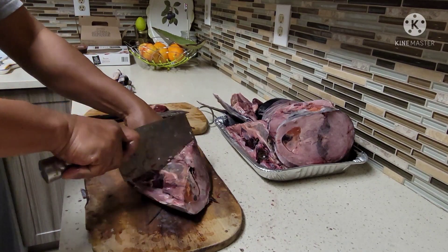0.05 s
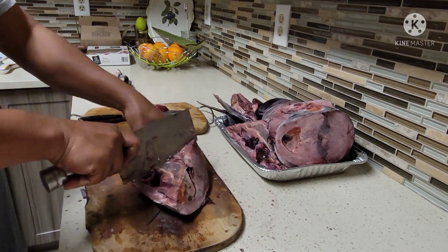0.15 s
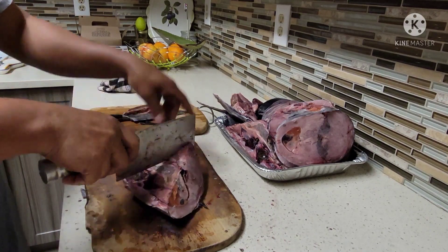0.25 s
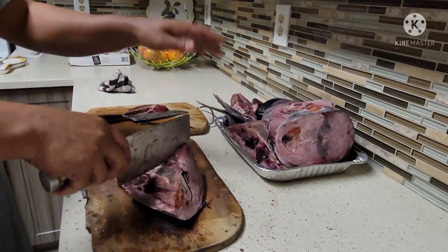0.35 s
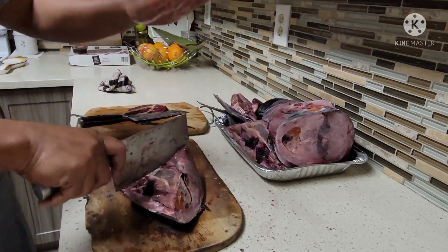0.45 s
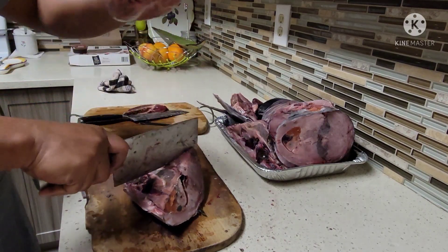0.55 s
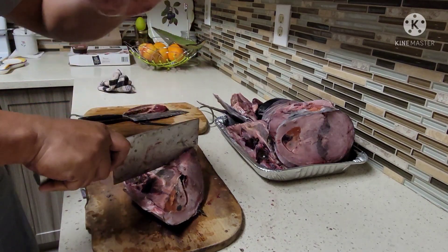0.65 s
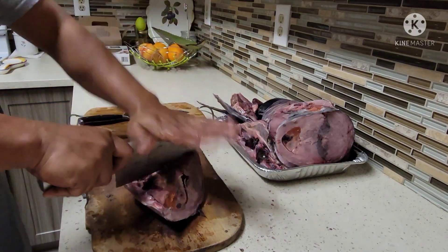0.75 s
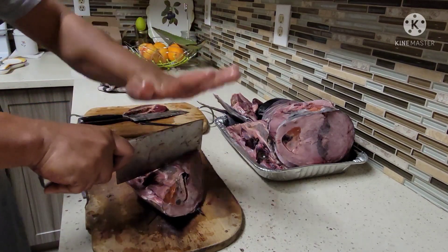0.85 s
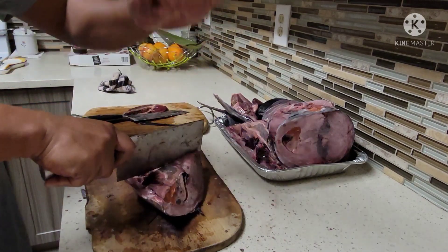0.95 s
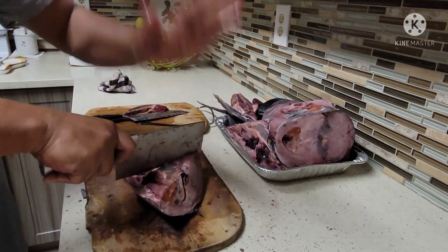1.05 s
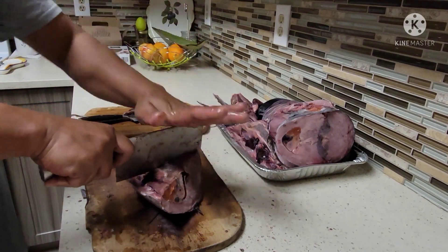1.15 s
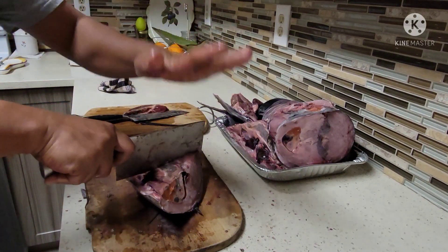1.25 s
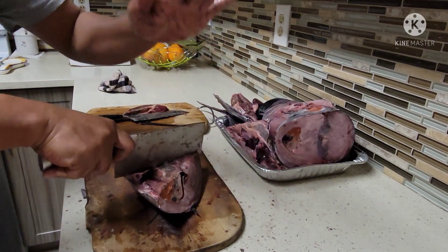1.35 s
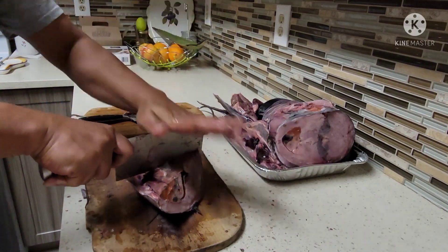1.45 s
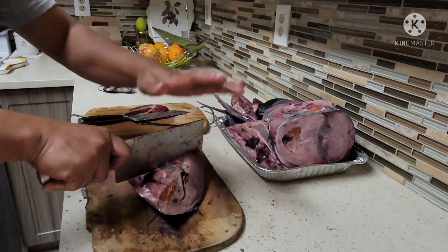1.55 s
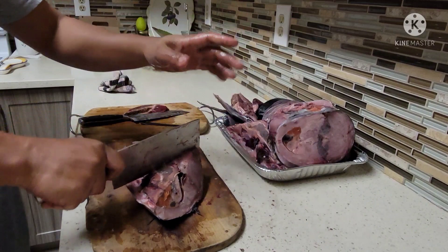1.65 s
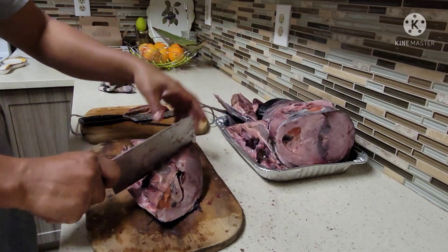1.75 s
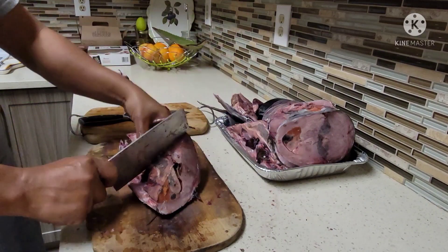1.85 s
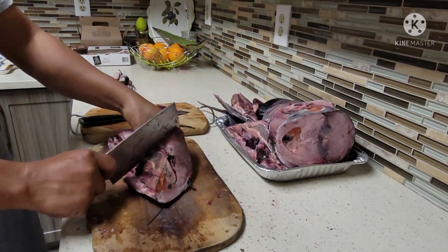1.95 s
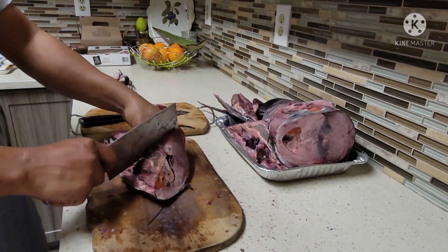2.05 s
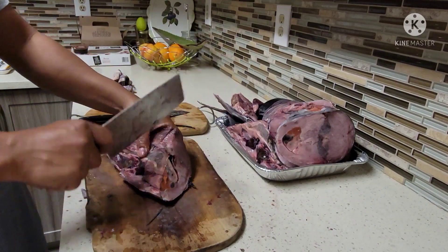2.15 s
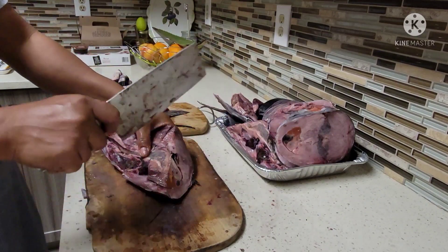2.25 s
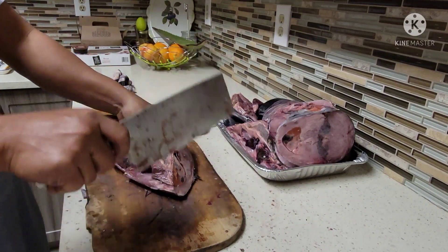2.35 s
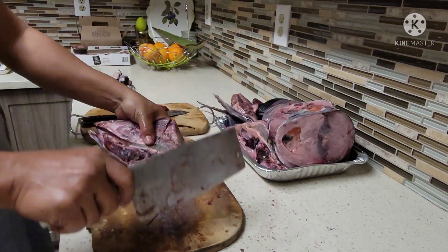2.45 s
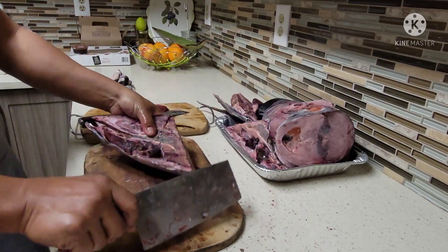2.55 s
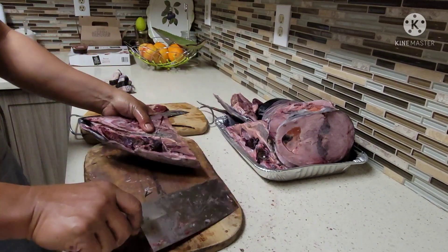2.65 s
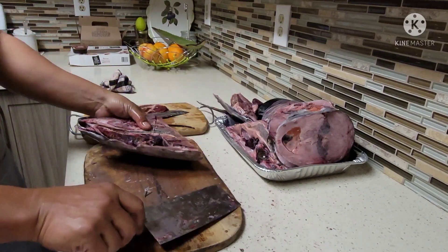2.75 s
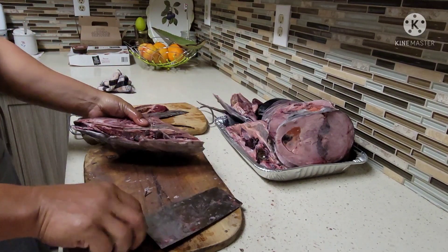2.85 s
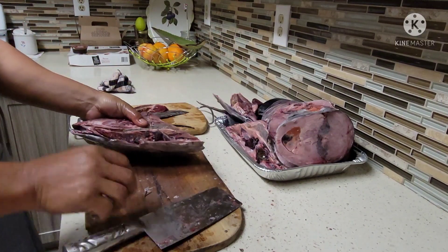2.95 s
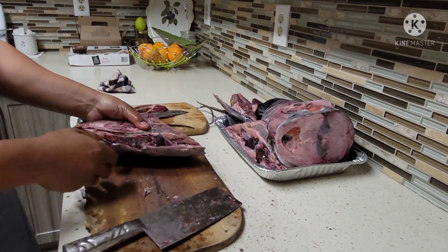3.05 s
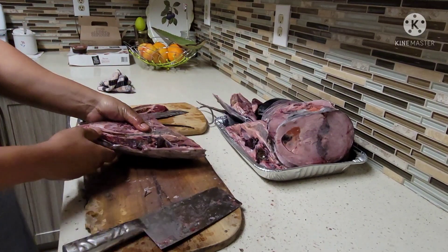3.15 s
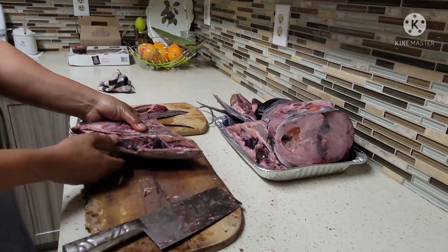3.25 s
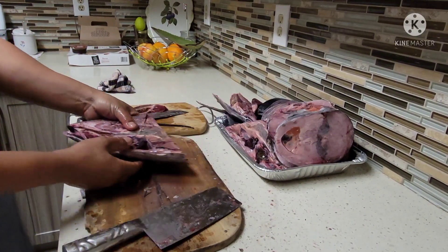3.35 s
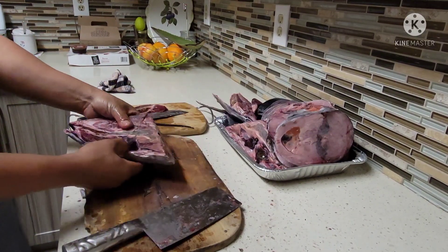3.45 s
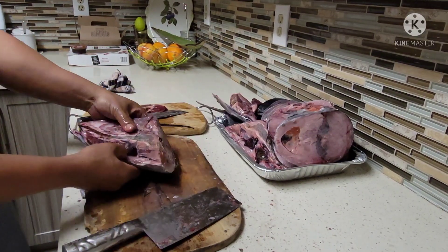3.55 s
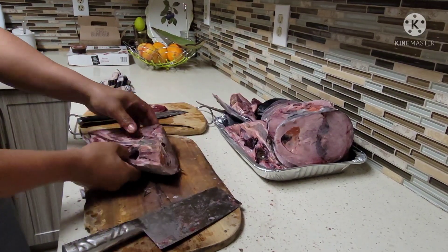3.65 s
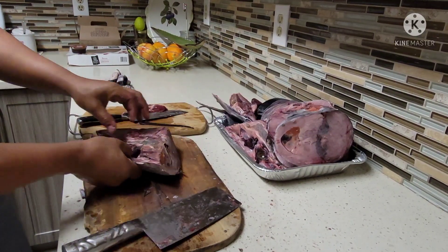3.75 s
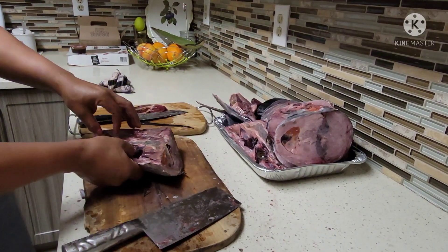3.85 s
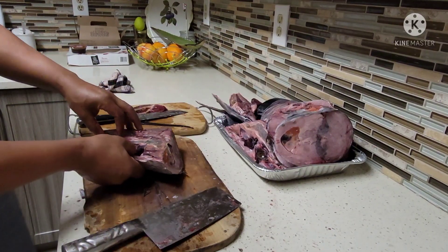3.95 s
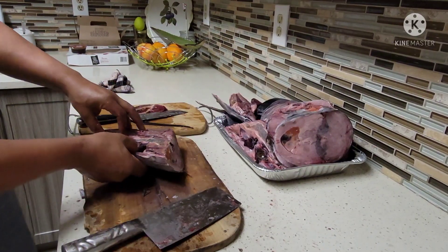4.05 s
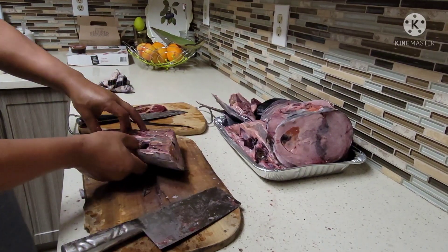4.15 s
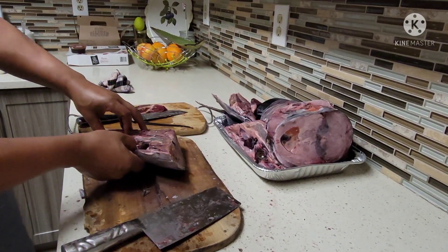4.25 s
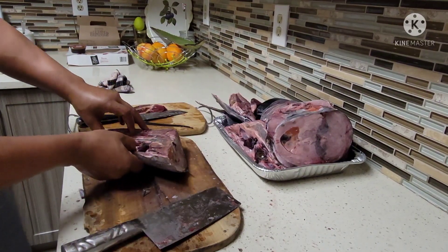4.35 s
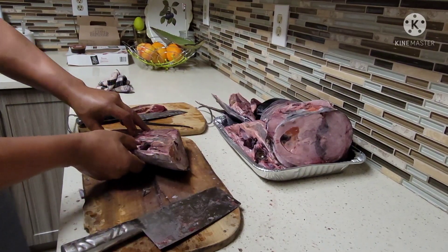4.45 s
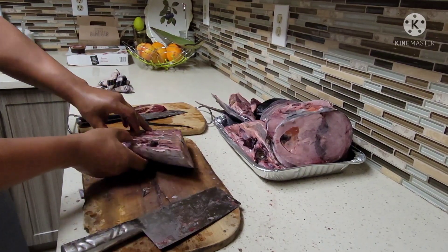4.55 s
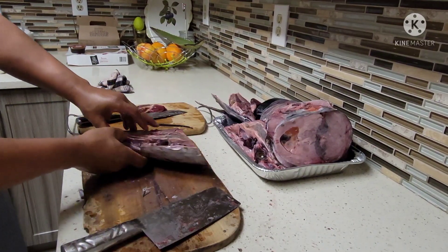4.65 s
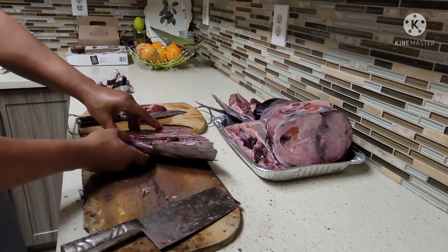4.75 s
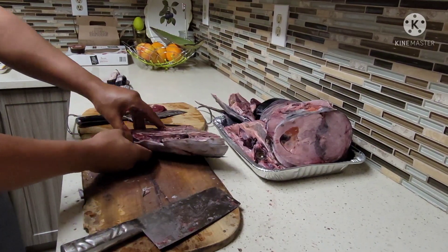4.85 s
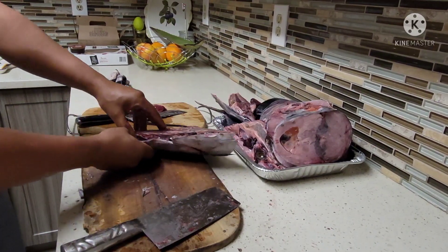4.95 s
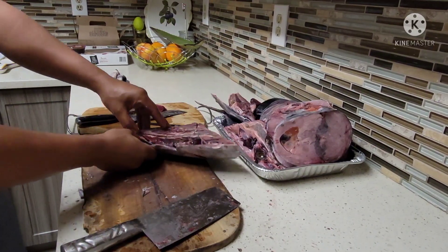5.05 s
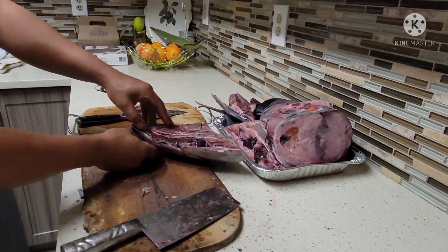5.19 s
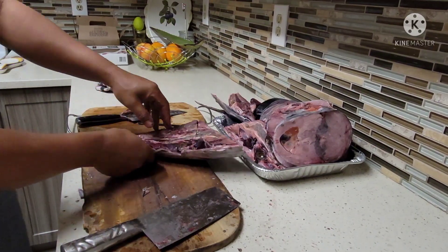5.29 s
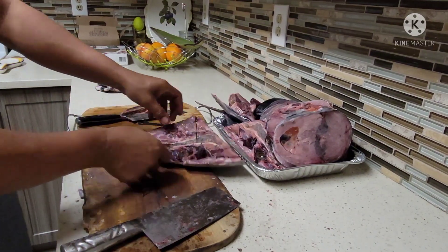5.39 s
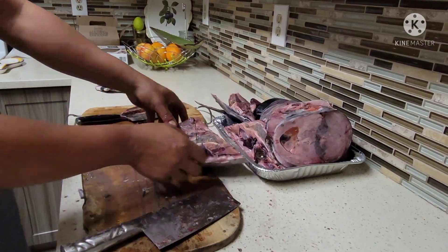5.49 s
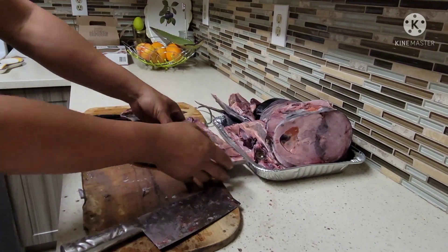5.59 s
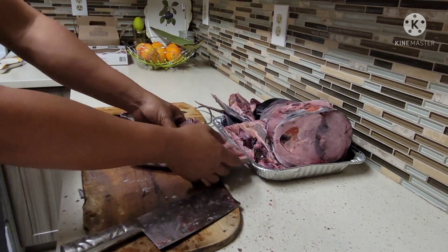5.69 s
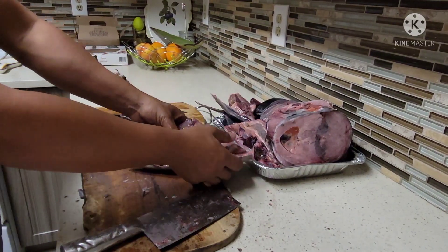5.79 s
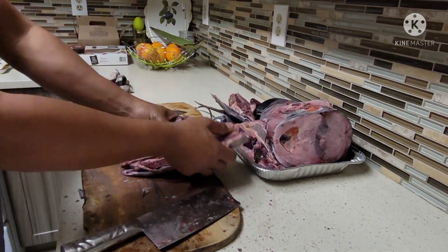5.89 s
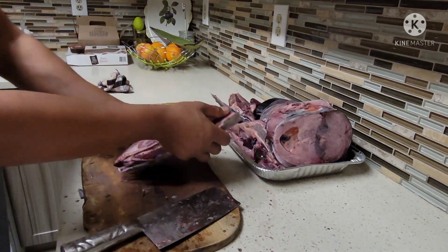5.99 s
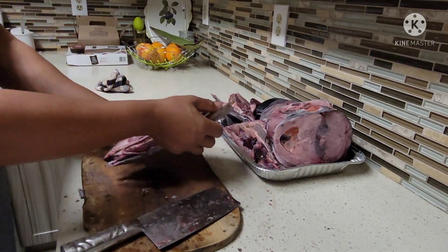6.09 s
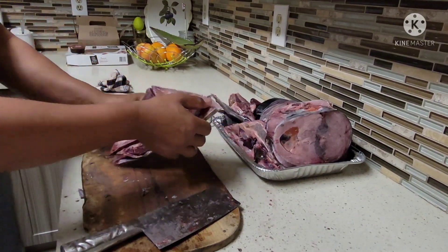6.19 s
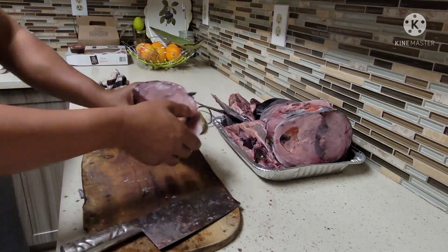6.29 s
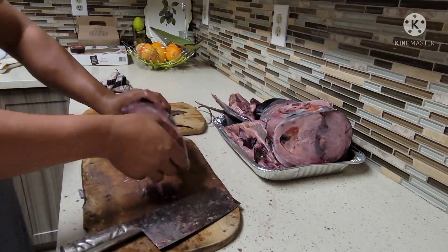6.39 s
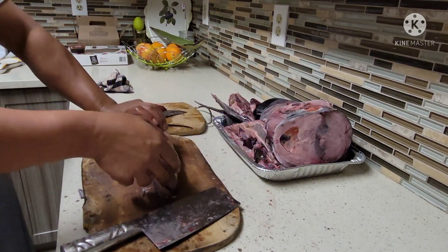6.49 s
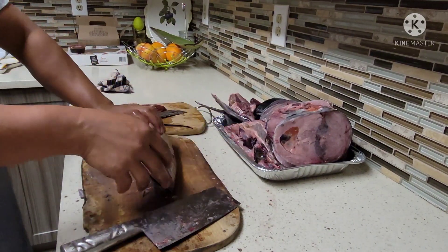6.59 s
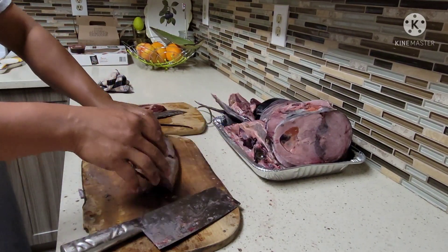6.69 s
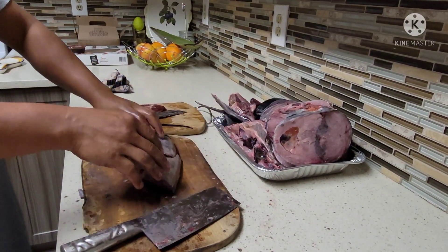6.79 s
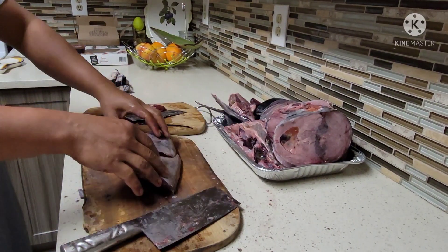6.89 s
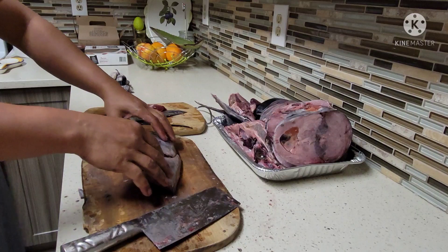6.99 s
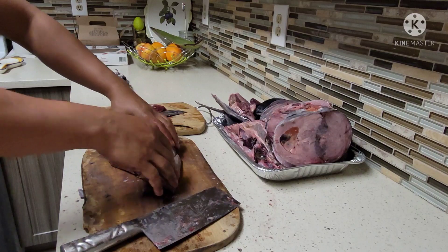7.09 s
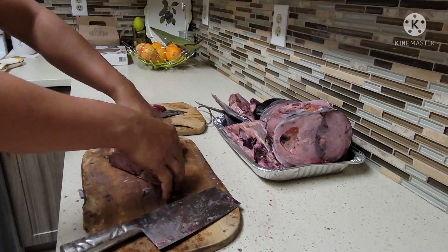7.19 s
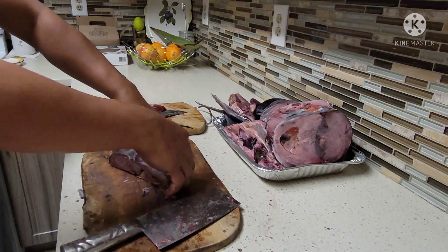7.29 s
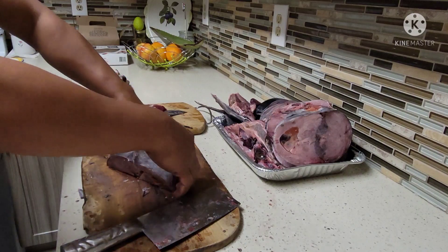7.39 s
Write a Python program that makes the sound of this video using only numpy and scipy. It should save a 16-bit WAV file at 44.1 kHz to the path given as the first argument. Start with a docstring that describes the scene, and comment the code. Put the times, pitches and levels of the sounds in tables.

```python
"""A small tiled kitchen, where a big fish is cut up on a wooden board. A palm drives a cleaver through it with
three blows; the fish is dragged aside, the cleaver is laid down (blade, then handle), a short ringing swish is
heard, and the wet slab is turned over and flopped back, bumping a foil tray. Board, steel and tray are sums of
damped modes; wet contacts are coloured noise bursts; rubbing and dragging are grainy friction noise. Short
hollow knocks and a faint airy tone are heard, fingers rub the crackling film, the room rumbles, and a faint low
hum swells and fades."""
import sys
import numpy as np
from scipy import signal
from scipy.fft import rfft, irfft, next_fast_len
from scipy.io import wavfile
from scipy.ndimage import uniform_filter1d, minimum_filter1d, map_coordinates

SR = 44100
rng = np.random.default_rng(int(sys.argv[2]) if len(sys.argv) > 2 else 0)


def dump(signal):
    """Clip the signal to [-1, 1] and save it as 16-bit WAV at the path in sys.argv[1]."""
    limited = np.clip(np.atleast_2d(signal).T, -1, 1)
    pcm = np.round(limited * 32767).astype(np.int16)
    wavfile.write(sys.argv[1], SR, pcm)


N = 327663  # samples in the scene
T = np.arange(SR * 6 // 10) / SR  # the time axis of one short event, in seconds

# Spectrum of sharp, bright clicks. Each row: frequency in Hz, level in dB.
SNAP_COLOUR = [(600, -15.5), (5500, 1), (15000, -5)]
# Spectrum of the crackling sticky film. Each row: frequency in Hz, level in dB.
CRACKLE = [(800, -23.5), (2500, -0.5), (5000, 0), (8000, -2), (11000, -8), (14500, -5.5)]


def amp(db):
    """Decibels are logarithmic: 20 dB is a factor of ten in amplitude."""
    return 10 ** (np.asarray(db) / 20)


def unit(x):
    """Normalisation of the mean power: the result has rms 1."""
    return x / np.sqrt(np.mean(x ** 2) + 1e-20)


def fade(t60):
    """Exponential damping: the amplitude falls by 60 dB in t60 seconds."""
    return 1000. ** (-T / max(t60, 1e-4))


def along(points, hz):
    """Logarithmic frequency scale: (Hz, value) points are joined by straight lines on it."""
    f, v = np.transpose(points)
    return np.interp(np.log(hz + 1), np.log(f + 1), v)


def add(out, s, sound):
    """Superposition: a sound is mixed in from time s, in seconds."""
    part = out[:, round(s * SR):][:, :sound.shape[-1]]
    part += sound[..., :part.shape[1]]


def filtered(x, response):
    """Linear filtering: the spectrum is multiplied by a response of frequency."""
    size = next_fast_len(x.shape[-1] + 8192)
    spectrum = rfft(x, size) * response(np.fft.rfftfreq(size, 1 / SR))
    return irfft(spectrum, size)[..., :x.shape[-1]]


def causal(x, db_of, size=4096):
    """Minimum phase: a folded cepstrum colours a hit without ringing ahead of it."""
    cepstrum = irfft(np.log(amp(db_of(np.fft.rfftfreq(size, 1 / SR)))))
    cepstrum[1:size // 2] *= 2
    cepstrum[size // 2 + 1:] = 0
    impulse_response = irfft(np.exp(rfft(cepstrum)))
    return signal.fftconvolve(x, impulse_response)[:len(x)]


def ring(modes, scatter_db):
    """Modal superposition: damped sines of alternating sign, each struck a little differently."""
    total = 0
    for k, (hz, db, t60) in enumerate(modes):
        strength = (-1) ** (k + 1) * amp(db + scatter_db * rng.normal())
        total = total + strength * np.sin(2 * np.pi * hz * T) * fade(t60)
    return total


def burst(length, rise):
    """Broadband impact noise: a dying spray, whitened to an even colour and scaled to energy 1."""
    x = rng.standard_normal(len(T)) * fade(length) * (1 - np.exp(-T / rise))
    power = np.abs(uniform_filter1d(np.abs(rfft(x, 4096)) ** 2, size=15))
    x = causal(x, lambda hz: -10 * np.log10(power / power.mean() + 1e-3))
    return x / np.linalg.norm(x)


def grains(colour, spiky):
    """Granular noise of rms 1: stereo noise whose strength varies unevenly over milliseconds."""
    knots = rng.standard_normal(N // 64 + 4)
    size = np.exp(spiky * map_coordinates(knots, [np.arange(N) / 64], order=1))
    noise = size * rng.standard_normal((2, N))
    return unit(filtered(noise, lambda hz: amp(along(colour, hz))))


def kitchen(x, wet_db):
    """Reverberation: direct sound, left ear first, plus a dense decaying tail from tiles and counter."""
    # Decay time of the room. Each row: frequency in Hz, t60 in seconds.
    room_decay = [(100, 0.57), (400, 0.23), (1500, 0.3), (5000, 0.24), (14000, 0.2)]
    hz, t, z = signal.stft(rng.standard_normal((2, len(T))), SR, nperseg=256)
    decaying = z * 1000. ** (-t / along(room_decay, hz)[:, None])
    tail = signal.istft(decaying, SR, nperseg=256)[1][:, :len(T)]
    tail *= 1 - np.exp(-T / 0.0005)
    tail /= np.linalg.norm(tail, axis=1, keepdims=True)
    direct = np.array([x, np.pad(x, (3, 0))[:len(x)]])  # right ear 3 samples late
    return direct + amp(wet_db) * signal.fftconvolve(x[None], tail, axes=1)[:, :len(x)]


def swell(s, attack, hold, release):
    """Envelope of one stroke: exponential growth to 1 at time s, a hold, then exponential decay."""
    t = np.arange(N) / SR - s
    growth = np.minimum(t, 0) / max(attack, 1e-3)  # attack and release are time constants in seconds
    decay = np.maximum(t - hold, 0) / max(release, 1e-3)
    return np.exp(growth - decay)


def bell(s, width):
    """Gaussian envelope: a gain that rises to 1 at time s and falls again."""
    return np.exp(-((np.arange(N) / SR - s) / max(width, 1e-3)) ** 2)


def wobble(rate):
    """Random modulation: a smooth curve through rate random knots a second."""
    return map_coordinates(rng.standard_normal(size=256), [np.arange(N) * rate / SR], mode="wrap")


def ambience():
    """Diffuse field: a rumble nearly alike at both ears in the bass, and a faint hum that swells twice."""
    # Spectrum of the room's rumble. Each row: frequency in Hz, level in dB.
    air_colour = [(13, -32.5), (22, -8.5), (44, -6), (59, -14.5), (92, -6.5), (198, -41), (371, -34),
                  (608, -38.5), (1630, -37), (1770, -35.5), (2270, -37.5), (15500, -48)]
    # Spectrum of the fuzzy low hum. Each row: frequency in Hz, level in dB.
    hum_colour = [(230, -42.5), (300, -5), (330, 1), (400, -5), (520, -17.5), (800, -9), (1200, -41)]
    # Swells of the hum. Each row: time of the peak in seconds, half width in seconds, level in dB.
    hum_swells = [(1.9, 0.19, -66), (3.85, 0.26, -67)]
    mid, side = rng.standard_normal((2, N))
    side = filtered(side, lambda hz: amp(along([(100, -12), (600, 3.0)], hz)))
    ears = np.array([mid + side, mid - side])
    air = unit(filtered(ears, lambda hz: amp(along(air_colour, hz))))
    hum_gain = amp(-79.5) + sum(amp(db) * bell(s, width) for s, width, db in hum_swells)
    return amp(-63.0) * air + hum_gain * grains(hum_colour, spiky=.1)


def handling():
    """Pressure-dependent friction: fingers rub the flesh and its sticky film crackles with each grip."""
    # A hand grips or shifts the wet fish. Each row: time of firmest pressure in seconds,
    # half width in seconds, rub level in dB, crackle level in dB.
    grips = [(.108, 0.15, -62, -58.5), (.45, 0.12, -70.5, -63.5), (1.3, 0.75, -73.5, -68.5),
             (2.192, .05, -64.5, -64.5), (3.201, .08, -66.5, -66.5), (4.192, .045, -60.5, -72),
             (5.207, .019, -60, -55.5), (5.27, 0.1424, -65, -64.5), (5.42, .035, -67, -58.5),
             (6.783, .035, -52, -63.5), (5.781, .06, -56.5, -66.5), (6.19, 0.071, -65, -70.5),
             (7.211, .06, -64, -66)]
    # Spectrum of fingers rubbing flesh. Each row: frequency in Hz, level in dB.
    rub_colour = [(200, -10.5), (400, -4.5), (700, -0.5), (1250, 1.5), (2000, -8), (3000, -2.5),
                  (5000, -17.5), (12000, -35.5)]
    # light finger contact between the grips, with one moment of rest
    light_rub_db, light_crackle_db = -85, -83
    light_swing_db, light_moves_per_s = 4, 32
    still_s, still_width_s = 4.53, 0.22
    light = amp(light_swing_db * wobble(light_moves_per_s)) * (1 - bell(still_s, still_width_s))
    rub, crackle = amp(light_rub_db) * light, amp(light_crackle_db) * light
    for s, width, rub_db, crackle_db in grips:
        pressure = bell(s, width)
        rub = rub + amp(rub_db) * pressure
        crackle = crackle + amp(crackle_db) * pressure
    return rub * grains(rub_colour, spiky=0.4) + crackle * grains(CRACKLE, spiky=0.38)


def slaps():
    """Soft impact: wet skin sprays noise while the flesh squashes, with a hollow body and a fizz on top."""
    # Wet skin and flesh contacts. Each row: start in seconds, relative level in dB,
    # body tilt in dB, fizz tilt in dB, squash time in seconds.
    contacts = [(0.1121, -45, -21, 5, 0.0025), (0.824, -25, 4.5, -0.5, 0.005), (1.159, -22, 8, 1.5, .0042),
                (1.492, -28.5, 12, -6, 0.0042), (2.0127, -46.5, -11, -5, 0.0025),
                (5.7321, -42.5, -6, -9, 0.00117), (5.8234, -45, -4.5, -10.5, 0.00086),
                (5.852, -28, -26, -15, .0012), (5.9068, -31.5, -5, -5, 0.0018), (5.9201, -26, -7, -3, .002),
                (6.516, -38.5, -6, -3.5, 0.0029), (6.7987, -22, 6, -16, 0.0033)]
    # Spectrum of smacked flesh. Each row: frequency in Hz, level in dB.
    flesh = [(30, -43.5), (100, -11.5), (250, 8), (450, 6.5), (900, 4.5), (1500, 2.5), (3000, -2.5),
             (5000, 0.5), (7500, 1), (10500, -4.5), (15000, -5)]
    out = np.zeros((2, N))
    for s, db, body_db, fizz_db, squash in contacts:
        tilt = [(500, body_db), (1200, 0.0013), (3300, 0.0035), (7000, fizz_db)]
        spray = burst(length=6 * squash, rise=squash)
        smack = causal(spray, lambda hz: along(flesh, hz) + along(tilt, hz))
        add(out, s, amp(db + 20.5) * kitchen(smack, wet_db=6.0))
    return out


def snaps():
    """Sudden release: the last air squeezed from a wet contact gives a gritty, bright click, almost dry."""
    # Snaps of squeezed air. Each row: start in seconds, relative level in dB.
    releases = [(0.1128, -40.5), (0.8272, -19.5), (1.1638, -15.5), (1.497, -27.5), (5.909, -34.5),
                (5.92, -27), (6.8, -25.5)]
    length_s, rise_s = .02, .001
    out = np.zeros((2, N))
    for s, db in releases:
        steps = rng.standard_normal(len(T) // 24 + 1).repeat(24)[:len(T)]  # a new strength every 24 samples
        grit = burst(length_s, rise_s) * amp(4 * steps)
        snap = causal(grit / np.linalg.norm(grit), lambda hz: along(SNAP_COLOUR, hz))
        add(out, s, amp(db + 17.5) * kitchen(snap, wet_db=-5.5))
    return out


def ticks():
    """Adhesive release: the sticky film lets go of a finger with a tiny bright burst."""
    # Releases of the film. Each row: start in seconds, relative level in dB.
    film_releases = [(0.542, -61), (2.145, -63.5), (2.847, -55), (5.536, -59), (6.305, -66)]
    length_s, rise_s = 0.0068, .001
    out = np.zeros((2, N))
    for s, db in film_releases:
        tick = causal(burst(length_s, rise_s), lambda hz: along(CRACKLE, hz))
        add(out, s, amp(db + 31) * kitchen(tick, wet_db=6.5))
    return out


def thuds():
    """Impulse response: a soft push booms the board on its counter; it rocks back and lands twice, weaker."""
    # Weight landing on the board. Each row: start in seconds, relative level in dB, contact time in seconds.
    landings = [(0.826, -3, 0.0013), (1.163, 3.5, 0.0016), (1.497, -4.5, 0.00091), (2.172, -31, 0.0038),
                (2.695, -29.5, 0.00085), (2.915, -19, 0.0008), (3.701, -25, 0.0046), (3.749, -23, 0.003),
                (6.52, -17, 0.0037), (6.799, -14, 0.00075), (6.812, -45, 0.00031)]
    # Modes of the board on its counter. Each row: frequency in Hz, level in dB, t60 in seconds.
    board = [(65, -16, .22), (87.6, -2.5, .27), (139.7, -2, .1), (167.4, -5, .14), (118, -11, .24),
             (325, -19, .22), (345, -15, .2), (400, -9, .06)]
    out = np.zeros((2, N))
    for s, db, contact in landings:
        push = T / contact * np.exp(-T / contact)
        struck_board = ring(board, scatter_db=1.4)
        boom = amp(db + 4.5) * signal.fftconvolve(struck_board, push / push.sum())[:len(T)]
        add(out, s, kitchen(boom, wet_db=-20.0))
        for delay, rock_db in [(.107, -21.5), (.195, -35.5)]:
            add(out, s + delay, amp(rock_db) * kitchen(boom, wet_db=-14.5))
    return out * amp([[-1], [1]])  # 2 dB stronger on the right


def hollow_knocks():
    """Single-mode damping: short hollow knocks, each one damped tone, down 60 dB in 14 cycles."""
    # Hollow knocks. Each row: start in seconds, relative level in dB, frequency in Hz.
    damped_tones = [(1.196, -27.5, 1125), (3.762, -54, 870), (5.34, -43.5, 1220), (5.733, -43, 1103),
                    (5.852, -32, 1560), (6.809, -16, 344)]
    out = np.zeros((2, N))
    for s, db, hz in damped_tones:
        envelope = fade(14 / hz) * (1 - np.exp(-T * hz))
        knock = amp(db + 7.5) * np.sin(2 * np.pi * hz * T) * envelope
        add(out, s, kitchen(knock, wet_db=-5))
    return out


def drag():
    """Sliding friction: wet skin hisses over the board in one shove, up to speed, steady, then slowing."""
    # Spectrum of the sliding skin. Each row: frequency in Hz, level in dB.
    drag_colour = [(200, -21.5), (300, -8), (420, -2.5), (600, -6), (850, -10), (1200, -16.5), (1900, -15),
                   (2800, -5.5), (4300, -9), (5300, -5), (7000, -16), (9200, -10), (11000, -19),
                   (15000, -18.5)]
    shove = swell(s=2.485, attack=0.018, hold=.1, release=0.05)
    return amp(-37) * shove * grains(drag_colour, spiky=0.25)


def chime(modes):
    """Modal radiation: steel modes radiate in lobes, so each reaches the ears a quarter cycle apart."""
    ears = np.pi / 4 * np.array([[1], [-1]])
    tones = 0
    for k, (hz, db, t60) in enumerate(modes):
        phase = 2 * np.pi * (hz * T + rng.random()) + (-1) ** k * ears
        tones = tones + amp(db) * np.sin(phase) * fade(t60)
    return tones * (1 - np.exp(-T / .0007))


def steel(modes):
    """Reverberant blurring: ringing steel, with a room tail of its own for each ear."""
    tones = chime(modes)
    left = kitchen(tones[0], wet_db=-7.5)[0]
    right = kitchen(tones[1], wet_db=-7)[0]
    return np.array([left, right])


def cleaver():
    """Impact excitation: the tip cracks on wood, the blade sings, the cleaver rocks, its handle drops, bounces."""
    # Contacts as the cleaver is laid down. Each row: start in seconds, relative clack level in dB,
    # relative blade ring level in dB, brightness tilt in dB, clack length in seconds, relative tip level in dB.
    laid_down = [(2.6946, -25, -10, 0, 0.0052, 2), (2.9134, -24, -44.5, 6, .008, -17),
                 (2.9153, -29, -42.5, 4, .02, -10.5)]
    # Modes of the blade. Each row: frequency in Hz, level in dB, t60 in seconds.
    blade = [(694, -10, .17), (1044, -17, .2), (1183, -17, .2), (1486, -15, .32), (2046, -17, .19),
             (2945, -4.5, .24), (4064, -18, .16), (4409, -22, .3), (6105, -30, .28), (6503, -23, .26),
             (9179, -34, .28), (12280, -33, .19)]
    # Modes of the steel tip on wood. Each row: frequency in Hz, level in dB, t60 in seconds.
    tip = [(920, -13.5, 0.0025), (1360, -3, 0.0054), (2160, -14.5, 0.0056)]
    # Modes of the steel handle. Each row: frequency in Hz, level in dB, t60 in seconds.
    handle = [(660, 1, .16), (848, 0, .17), (1362, -3, .16), (2176, -5, .16), (4520, -11, .27),
              (5535, -3, .22), (6632, -12, .22), (8543, -14, .18), (9938, -13, .16), (12100, -16, .12),
              (12930, -18, .2), (14550, -22, .19)]
    # Spectrum of the clack. Each row: frequency in Hz, level in dB.
    clack_colour = [(150, -38), (300, -10), (700, -5), (1400, -9.5), (2200, -11), (3000, -9.5), (3700, -25),
                    (4500, -14.5), (5600, -19), (7600, -28), (13000, -38.5), (15500, -45)]
    # Rocking before the handle drops. Each row: start in seconds, relative level in dB, initial frequency in Hz.
    rocks = [(2.852, -32, 552), (2.87, -28.5, 423.6)]
    out = np.zeros((2, N))
    for s, clack_db, blade_db, bright_db, length, tip_db in laid_down:
        tilt = [(4200, 0), (5500, bright_db), (9000, 0.0044)]
        clack = causal(burst(length, rise=0.00024), lambda hz: along(clack_colour, hz) + along(tilt, hz))
        add(out, s, kitchen(amp(clack_db + 45.5) * clack, wet_db=5.5))
        add(out, s, kitchen(amp(tip_db + 2) * ring(tip, scatter_db=.3), wet_db=-1))
        crack = causal(burst(length=.004, rise=0.0003), lambda hz: along(SNAP_COLOUR, hz))
        add(out, s, kitchen(amp(clack_db + 25) * crack, wet_db=-8))
        add(out, s, amp(blade_db - 2) * steel(blade))
    add(out, 2.914, amp(-24.5) * steel(handle))
    for s, db, hz in rocks:
        sinking_cycles = hz * np.cumsum(np.exp(-T / 0.051)) / SR  # the pitch falls exponentially
        rock = np.sin(2 * np.pi * sinking_cycles) * fade(.055) * (1 - np.exp(-T / .004))
        add(out, s, kitchen(amp(db + 2.5) * rock, wet_db=3.0))
    return out


def swish():
    """Resonant filtering: a short ringing swish, swelling noise through narrow resonances, with some hiss."""
    # Resonances of the swish. Each row: frequency in Hz, level in dB.
    resonances = [(969, 2), (1580, -5), (1930, -2), (2312, 6), (2822, 4), (3090, 4), (3412, 2), (3673, 8),
                  (4400, 1), (5300, -1), (6300, 4), (7230, 0), (8160, 4), (8959, 2), (9250, 2), (10170, 0),
                  (11600, 2), (12200, 1), (13700, 1)]

    def body(f):
        """Second-order resonators: a band-pass response around each centre frequency, summed."""
        response = 0
        for centre, db in resonances:
            width_hz = 18 + .003 * centre  # a fixed part plus a share of the frequency
            damping = 1j * f * width_hz
            response = response + amp(db) * damping / (centre * centre - f * f + damping)
        return response

    lighter_swell = amp(-11.5) * swell(s=3.368, attack=0.011, hold=0.01, release=.008)
    envelope = swell(s=3.391, attack=0.0036, hold=.022, release=0.048) + lighter_swell
    ringing = filtered(envelope * grains([(1000, 0)], spiky=.45), body)  # driven by noise of even colour
    hiss = envelope * grains(SNAP_COLOUR, spiky=0.45)
    return amp(-24.5) * ringing + amp(-42.5) * hiss


def airy_tones():
    """Frequency and amplitude modulation: a faint, fluttering airy tone near 1.2 kHz, its pitch jittered."""
    # Airy tones. Each row: time of the middle in seconds, length in seconds, relative level in dB, pitch in Hz,
    # rise in the middle as a share of the pitch, random jitter as a share of the pitch.
    faint_tones = [(4.911, .32, -68, 1215, 0.00057, 0.101)]
    jitters_per_s, overtone_db = 190, -18
    flutter_db, flutters_per_s = 5.5, 92
    out = np.zeros((2, N))
    for s, length, db, hz, rise, jitter in faint_tones:
        arch = np.sin(np.pi * np.minimum(T / length, 1))
        pitch = hz * (1 + rise * arch ** 4 + jitter * wobble(jitters_per_s)[:len(T)])
        phase = 2 * np.pi * np.cumsum(pitch) / SR
        tone = arch * (np.sin(phase) + amp(overtone_db) * np.sin(2 * phase))
        flutter = amp(flutter_db * wobble(flutters_per_s)[:len(T)])
        add(out, s - length / 2, amp(db) * kitchen(flutter * tone, wet_db=1.5))
    return out


def tray_knocks():
    """Modal excitation: flesh bumps the loaded foil tray, stirring its modes a little differently each time."""
    # Bumps. Each row: start in seconds, level in dB.
    bumps = [(5.733, -51), (5.852, -45.5), (5.921, -35)]
    # Modes of the loaded tray. Each row: frequency in Hz, level in dB, t60 in seconds.
    tray = [(510, -1.5, 0.12), (673, -1.5, 0.14), (1145, -3, 0.078), (1750, 1, 0.079)]
    out = np.zeros((2, N))
    for s, db in bumps:
        add(out, s, kitchen(amp(db) * ring(tray, scatter_db=4.5), wet_db=-2.5))
    return out


def scene():
    """Superposition: everything at the counter sounds together."""
    blows = thuds() + slaps() + snaps() + tray_knocks()
    small_sounds = hollow_knocks() + ticks() + airy_tones() + handling()
    return blows + small_sounds + cleaver() + drag() + swish() + ambience()


def record(dry):
    """Peak limiting and band limiting: a quick gain dip holds loud peaks to 0.97, then the top is cut off."""
    needed = 1 / np.maximum(np.abs(dry).max(axis=0) / .97, 1)
    gain = uniform_filter1d(minimum_filter1d(needed, size=441), size=441)  # 441 samples are 10 ms
    top_hz = 15900
    return filtered(dry * gain, lambda hz: hz < top_hz)


dry = scene()
out = record(dry)
dump(out)
```